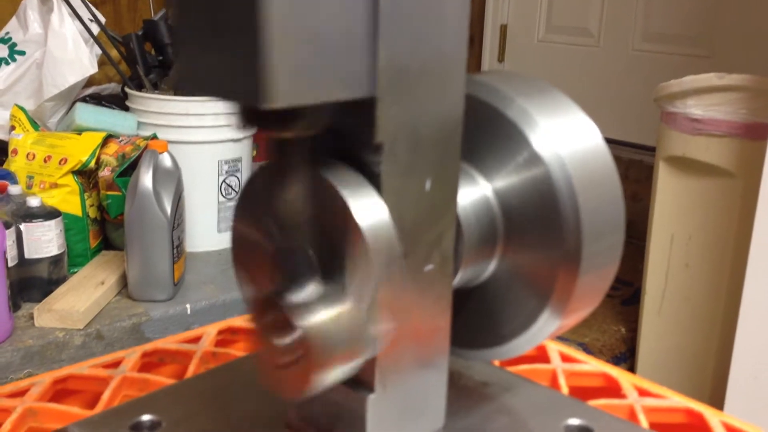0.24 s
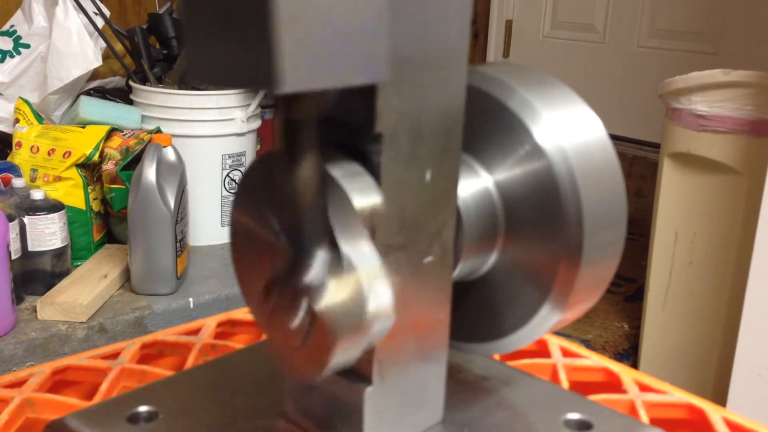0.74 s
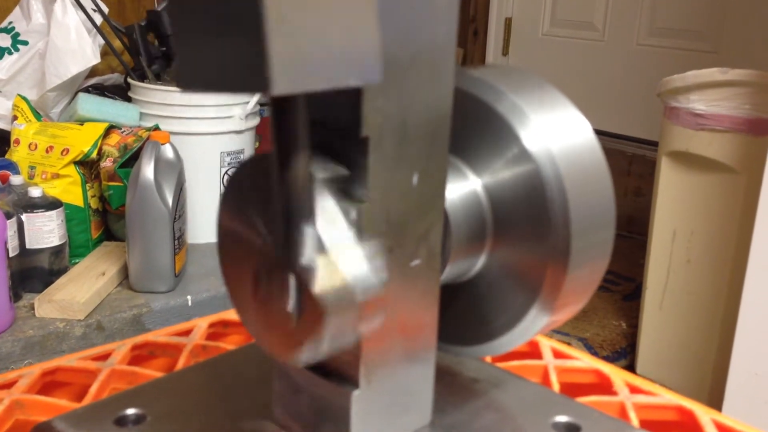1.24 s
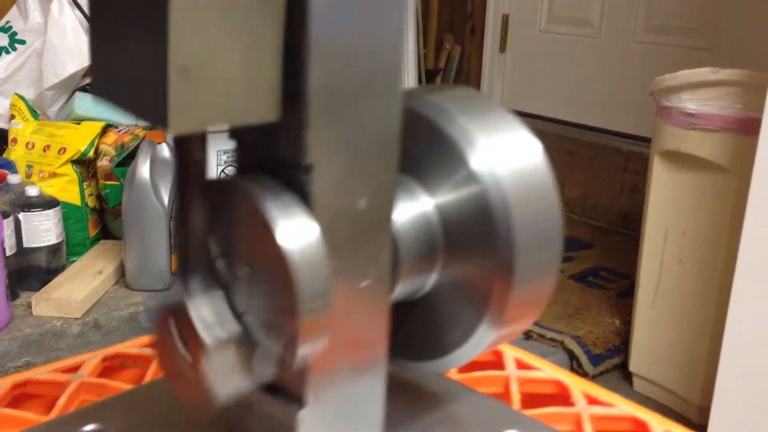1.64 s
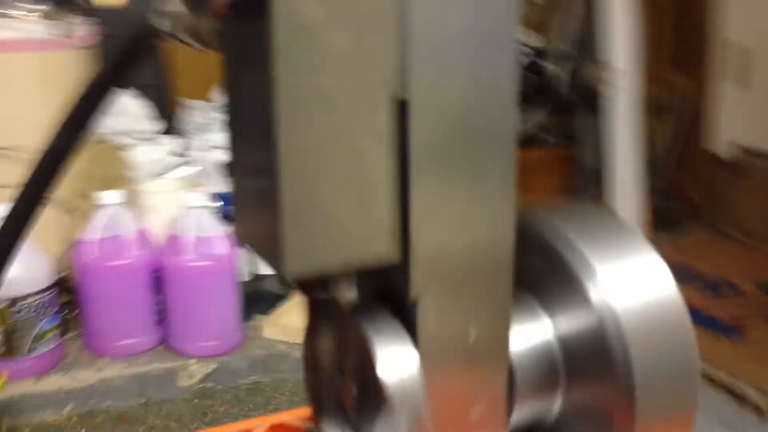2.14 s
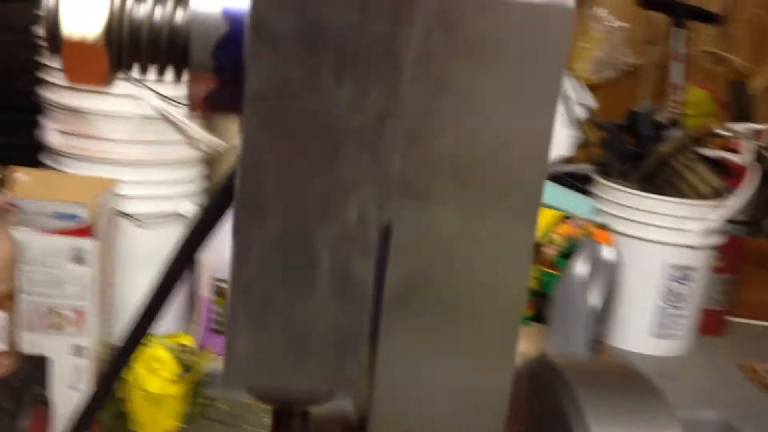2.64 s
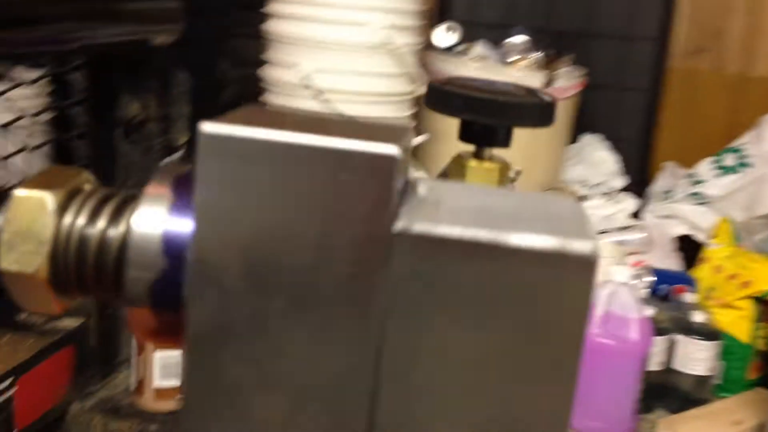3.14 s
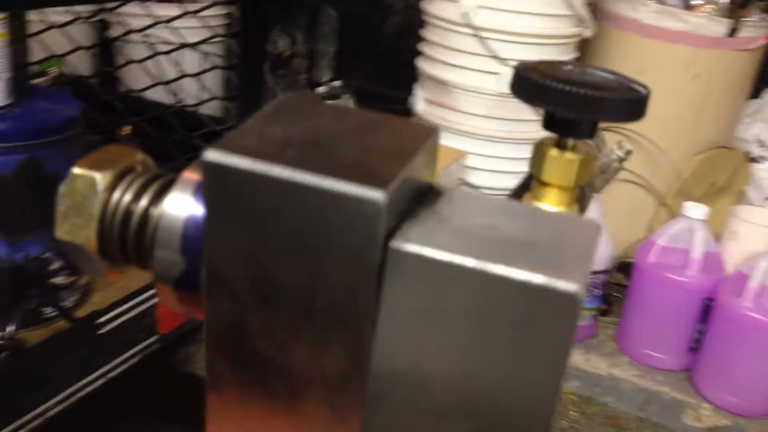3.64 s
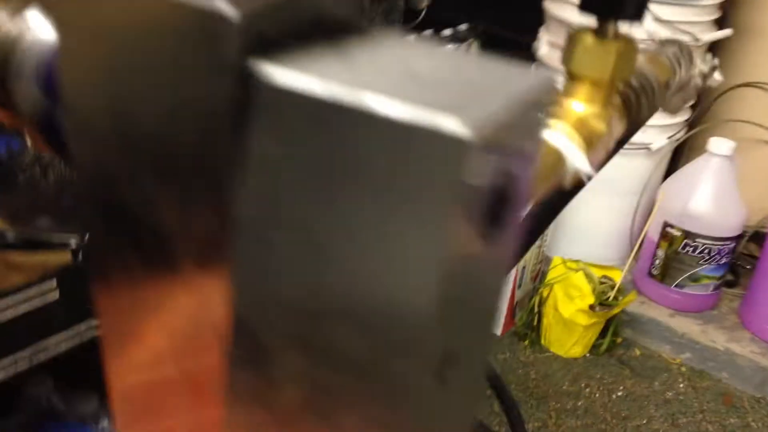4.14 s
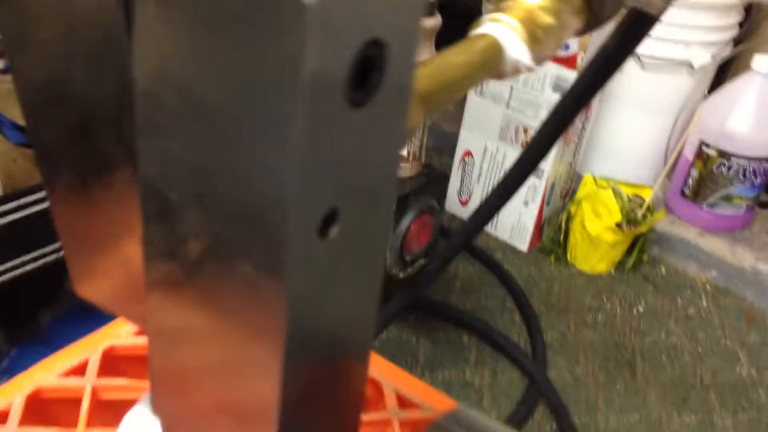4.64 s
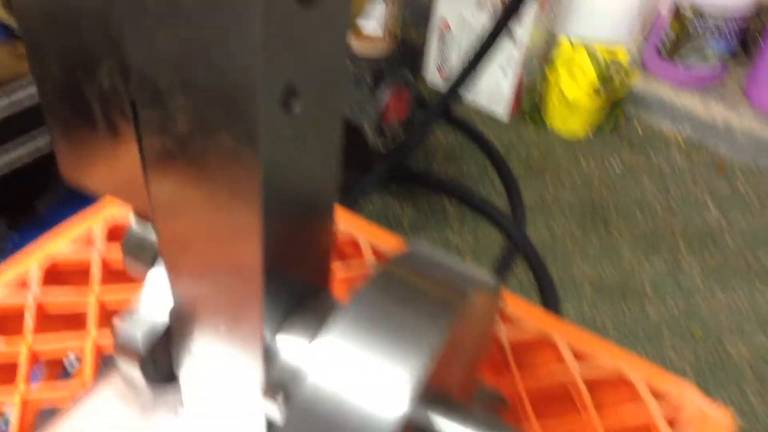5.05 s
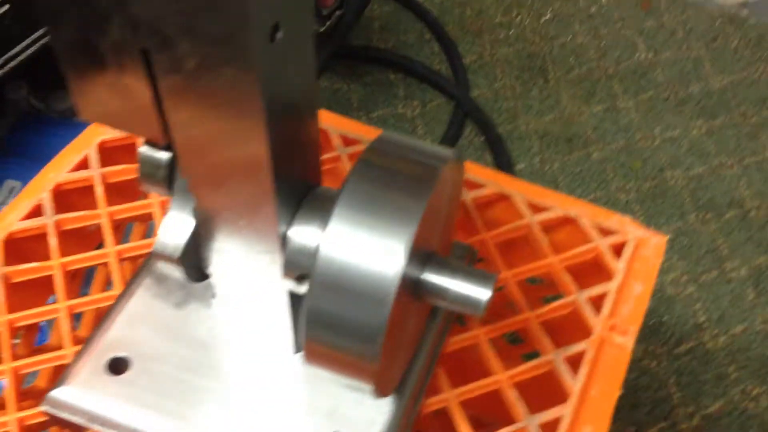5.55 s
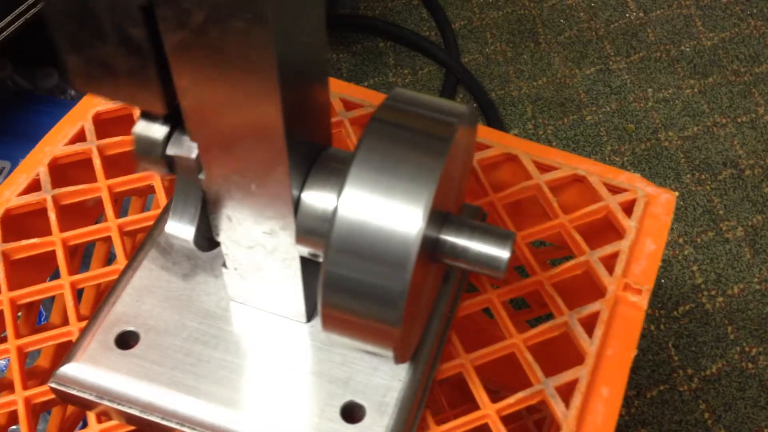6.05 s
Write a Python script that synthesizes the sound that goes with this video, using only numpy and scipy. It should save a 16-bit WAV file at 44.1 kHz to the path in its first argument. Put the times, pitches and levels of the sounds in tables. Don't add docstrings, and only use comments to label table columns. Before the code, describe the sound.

A small metal air engine runs slowly close to the microphone. Each half-second turn gives a loud, abrupt bright puff, a light steel click with a muted hollow knock from the plastic crate below, then a quieter, slightly longer whistly puff and a tiny tick. Soft rubbing, faint hiss and low rumble sit behind in a small workshop with short reverberation. The rhythm slows slightly towards the end.

```python
import sys
import numpy as np
from scipy import signal
from scipy.fft import rfft, irfft, next_fast_len
from scipy.io import wavfile
from scipy.ndimage import uniform_filter1d

SR = 44100
rng = np.random.default_rng(int(sys.argv[2]) if len(sys.argv) > 2 else 0)


def rack_gain(trim_db):
    fader = np.asarray(trim_db, float)
    return 10 ** (fader / 20)


def output_pcm(signal):
    pcm = np.clip(np.atleast_2d(signal).T, -1, 1) * 32767
    wavfile.write(sys.argv[1], SR, np.round(pcm).astype(np.int16))


N = 278251

# start_s, peak_db, first_resonance_db, upper_resonances_db, port_open_s
SHORT_PUFFS = [(0.301, -5.5, -9.5, -8.5, 0.0044), (0.7764, -7, -9, -6, 0.0067),
               (1.2543, -4.5, -9.5, -8, 0.0028), (1.7404, -7.5, -4.5, -8, 0.0042),
               (2.2261, -8, -7, -8.5, 0.0043), (2.7048, -9.5, -7.5, -5.5, 0.0096),
               (3.1966, -8, -7, -7, 0.0069), (3.759, -7.5, -10.5, -8, 0.006), (4.2997, -9, -9, -7, 0.011),
               (4.8115, -6.5, -6, -5.5, 0.0043), (5.3447, -9, -8, -5.5, 0.0087),
               (5.9369, -7.5, -8.5, -5.5, 0.0066)]
LONG_PUFFS = [(0.0034, -16.5, -6.5, -8, 0.013), (0.4833, -17.5, -4.5, -7.5, 0.014),
              (0.9652, -13, -8, -10.5, 0.0052), (1.441, -16.5, -7.5, -10, 0.012),
              (1.9275, -14, -8, -11, 0.0087), (2.4119, -15.5, -4.5, -8.5, 0.012),
              (2.896, -13, -5, -8.5, 0.011), (3.3952, -15.5, -7.5, -9.5, 0.019),
              (3.9544, -16.5, -5.5, -8, 0.025), (4.493, -15.5, -7, -5, 0.014),
              (5.005, -20, -6, -8.5, 0.022), (5.5444, -17, -9, -10, 0.02), (6.131, -16, -6, -8, 0.011)]
# centre_hz, width_hz, level_db
PORT_MODES = [(2020, 330, -.5), (2400, 330, -2.5), (6300, 620, 2), (10750, 950, -1), (14900, 1300, -6)]
# centre_hz, width_hz, level_db
WHISTLES = [(2076, 70, -1.5), (6206, 200, -2.5), (10750, 300, -1)]
# freq_hz, level_db
SHORT_JET = [(200, -47), (700, -33), (1400, -14), (2200, -2.5), (3500, -10.5), (5000, -11), (8500, -10),
             (10500, -3), (13000, -9.5), (15000, -4.5)]
LONG_JET = [(200, -41), (700, -32.5), (1400, -13), (2200, -5), (3500, -10), (5000, -10), (8500, -13.5),
            (10500, -9.5), (13000, -14.5), (15000, -13.5)]
# time_s, shop_openness_db, facing_outflow_db, on_port_axis_db
CAMERA = [
    (0, 0.1, -25, -1),
    (.7, -0.7, -11.5, 3),
    (1.4, -0.1, -15.5, -0.5),
    (2.1, -1, -11, 1.5),
    (2.8, -2.5, -16, -2.4),
    (3.5, -4, -14.5, -5),
    (4.2, -7.5, -38, -1),
    (4.9, -7, -25, -2.4),
    (5.6, -3, -17.5, 5.5),
    (6.31, -5.5, -26, -1),
]
# start_s, click_db, crate_db, crate_hz, bounce_delay_s
KNOCKS = [(0.397, -21.5, -35, 478, 0.007), (0.8751, -20.5, -38, 440, 0.0064),
          (1.3508, -22, -36, 490, 0.0053), (1.8378, -23.5, -35.5, 467, 0.005),
          (2.3229, -20.5, -34.5, 482, 0.0075), (2.8043, -17.5, -36.5, 463, 0.0066),
          (3.2989, -24.5, -39.5, 475, 0.0063), (3.8616, -27, -37.5, 496, 0.007),
          (4.4046, -28, -36.5, 458, 0.0081), (4.9141, -28, -42, 449.4, 0.0058),
          (5.448, -27.5, -40, 498, 0.0045), (6.0395, -28.5, -42, 487, 0.0054)]
# freq_hz, t60_s, level_db
STEEL_MODES = [(4440, 0.0065, -3.5), (7030, 0.0091, 3.5), (8000, 0.012, -5), (2800, 0.01, -3)]
# freq_hz, t60_s, level_db
CRATE_MODES = [(358.5, 0.017, -21), (559, 0.079, -11.5), (779, 0.047, -11), (1108, 0.035, -9),
               (1600, 0.021, -12.5), (2430, 0.023, -32)]
# start_s, click_db, ring_db, ring_hz
TICKS = [(0.2317, -41, -46, 836), (0.7073, -41.5, -47, 810), (1.1854, -42, -45, 1440),
         (1.6728, -42.5, -44, 870), (2.158, -43.5, -48, 904), (2.6379, -45.5, -52, 806),
         (3.127, -42.5, -49, 800), (3.692, -47.5, -49.5, 1093), (4.236, -43.5, -51.5, 802),
         (4.7418, -45, -55, 1037), (5.2769, -50.5, -55.5, 845), (5.8698, -49.5, -52, 810)]
# start_s, level_db, centre_hz, spread_octaves, t60_s
SNAPS = [(0.1533, -47.5, 11500, 0.54, .005), (0.216, -58, 1130, 0.21, 0.054),
         (1.112, -47.5, 10100, .5, .005), (2.05, -35, 420, 1.43, .016), (3.338, -48.5, 9850, 0.46, .005),
         (3.7035, -43, 8900, 0.67, .008), (3.91, -47, 148.3, .3, .07), (4.204, -46.5, 6000, 1.1, .008),
         (4.482, -41, 7000, .8, .005), (4.986, -45, 7060, 0.55, .005), (5.812, -57, 8000, .9, .006)]
# slide_drag_db, shake_db
STROKES = [(0.5, 1.3), (3, 3), (-0.5, 2.5), (-2.5, 3), (2.5, -2), (4, 1.5), (3.5, -1.5), (-6, 2),
           (-2.8, -2), (-2, -4), (-5, -17), (-6.5, 0.5)]
# crank_deg, level_db
RUB_BY_ANGLE = [(0, -58.5), (90, -61.5), (170, -61), (205, -76.5), (260, -73), (310, -62.5)]
# freq_hz, level_db
RUB_SPECTRUM = [(150, -10.5), (250, -8.5), (450, -8), (800, -4.5), (1300, -18), (2500, -15.5),
                (6000, -30.5), (16000, -53.5)]
# crank_deg, level_db
RUMBLE_BY_ANGLE = [(0, -71), (22, -56.5), (50, -66.5), (100, -68), (170, -70.5), (250, -73), (330, -72.5)]
# freq_hz, level_db
RUMBLE_SPECTRUM = [(12, -48.5), (20, -23), (64, 5), (97, -2.5), (124, 4), (182, -3), (216, 3.5),
                   (300, -14.5), (390, -29.5), (660, -120)]
# centre_s, level_db, width_s
BUMPS = [
    (1.14, -71, .04),
    (2.47, -66, .05),
    (3.02, -66, .05),
    (4.12, -70.5, .05),
    (2.05, -62.5, 0.034),
    (3.459, -61, 0.054),
    (3.92, -58.5, .04),
]
# freq_hz, level_db
AIR_SPECTRUM = [(120, -28.5), (200, -6), (400, -3), (800, -15.5), (1500, -11), (2200, -12.5), (4000, -9.5),
                (6200, -11), (9000, -19), (15500, -18)]
# centre_hz, level_db, width_hz
HUM_BANDS = [(73, -79.5, 14), (125, -81.5, 2.7)]
# freq_hz, t60_s
SHOP_T60 = [(300, 0.66), (1200, 0.38), (2150, 0.4), (3800, 0.32), (6200, 0.34), (8500, 0.3), (11000, 0.24),
            (16000, 0.27)]
# freq_hz, level_db
CAMERA_BAND = [(15, -21), (45, -2), (80, 0), (15120, 0), (15270, -6), (15370, -26), (15600, -36),
               (15900, -52), (17000, -60)]


def unit(x):
    return x / np.sqrt(np.mean(x ** 2) + 1e-20)


def along(points, hz):
    f, v = np.transpose(points)
    return np.interp(np.log(hz + 1), np.log(f + 1), v)


def columns_at(s, times_s, rows):
    return [np.interp(s, times_s, column) for column in np.transpose(rows)]


def camera_at(s):
    table = np.array(CAMERA)
    return columns_at(s, table[:, 0], table[:, 1:])


def bell(hz, centre_hz, width_hz):
    return 1 / (1 + ((hz - centre_hz) / width_hz) ** 2)


def shut(t, at_s, width_s):
    return 1 / (1 + np.exp(np.minimum((t - at_s) / width_s, 99)))


def noise(size, gain):
    m = next_fast_len(size)
    spectrum = rfft(rng.standard_normal(m)) * gain(np.fft.rfftfreq(m, 1 / SR))
    return unit(irfft(spectrum, m)[:size])


def patchy(x, depth_db):
    z = signal.stft(x, nperseg=128)[2]
    field = uniform_filter1d(rng.standard_normal(z.shape), size=2, axis=0)
    field = uniform_filter1d(field, size=7, axis=1)
    y = signal.istft(z * rack_gain(depth_db * unit(field)), nperseg=128)[1]
    return unit(y[:len(x)])


def ring(hz, t60_s, t, attack_s):
    return rack_gain(-60 * t / t60_s) * (1 - np.exp(-t / attack_s)) * np.sin(2 * np.pi * hz * t)


def add(track, s, x):
    part = track[round(s * SR) + SR // 10:][:len(x)]
    part += x[:len(part)]


def port(hz, sharp):
    power = sum(rack_gain(db) ** 2 * bell(hz, c, w / (2 * sharp)) for c, w, db in PORT_MODES)
    return np.sqrt(power)


def puff(row, turn_s, jet, empty_s, whistle_db, rise_s, lag_s, lead_db, tone_db, sharp, stay,
         linger_db, linger_s, pop_db, pop_s):
    start_s, db, low_db, high_db, open_s = row
    t = np.arange(SR // 2) / SR - 0.05
    shop_db, outflow_db, axis_db = camera_at(start_s)
    turn_ratio = turn_s / 0.49
    empty_s = empty_s * turn_ratio
    warm = rng.normal(1, 0.008) * turn_ratio ** 0.08
    tilt = [(2200, low_db), (6300, 0.0048), (10500, high_db), (14000, high_db + axis_db)]

    def view(hz):
        return rack_gain(along(tilt, hz) + along(jet, hz))

    def whistle(hz):
        return sum(rack_gain(whistle_db + g) * bell(hz * warm, c, w) for c, w, g in WHISTLES)

    quick = 0.82 + 0.04 * shop_db
    opening = np.exp(-np.exp((lag_s - t) / (quick * rise_s)))
    leak = rack_gain(lead_db) * shut(-t, 0.015, 0.0068)

    def emptying(slow):
        return (opening + leak) * shut(t, open_s, slow * empty_s)

    x = emptying(0.83) * patchy(noise(len(t), view), depth_db=4)
    tone = noise(len(t), lambda hz: view(hz) * (port(hz * warm, sharp) + 0.41 * whistle(hz)))
    x += rack_gain(tone_db) * emptying(stay) * patchy(tone, depth_db=3)
    thin = noise(len(t), lambda hz: view(hz) * (0.1 + port(hz * warm, 0.77) + whistle(hz)))
    fade = np.exp(-np.maximum(t, 0) / linger_s)
    x += rack_gain(linger_db + outflow_db) * opening * fade * patchy(thin, depth_db=1)
    pop = noise(len(t), lambda hz: hz / 600 / (1 + (hz / 1100) ** 3))
    x += rack_gain(pop_db + low_db) * opening * np.exp(-np.maximum(t - lag_s, 0) / pop_s) * pop
    x += rack_gain(shop_db - 15.5) * shop(x)
    return t[0], rack_gain(db + 2) * x


def puffs(rows, jet, **flow):
    out = np.zeros(N + SR)
    turns_s = np.gradient(np.transpose(rows)[0])
    for row, turn_s in zip(rows, turns_s):
        lead_s, x = puff(row, turn_s, jet, **flow)
        add(out, row[0] + lead_s, x)
    return out


def steel_click(t):
    return sum(rack_gain(g + rng.normal(0, 4.7)) * ring(hz * rng.normal(1, 0.12), t60_s, t, 0.00043)
               for hz, t60_s, g in STEEL_MODES)


def crate_note(crate_hz, t):
    body = ring(crate_hz * (1 - 0.16 * np.exp(-t / 0.009)), 0.08, t, 0.0049)
    rattle = noise(len(t), lambda hz: bell(hz, crate_hz, 70) + 0.3 * bell(hz, 760, 110))
    body += 0.3 * rack_gain(-60 * t / 0.12) * (1 - np.exp(-t / 0.0025)) * rattle
    body += sum(rack_gain(g + 1.5 + rng.normal(0, 1.4)) * ring(hz * rng.normal(1, 0.071), t60_s, t, 0.0033)
                for hz, t60_s, g in CRATE_MODES)
    return body


def knocks():
    out, t = np.zeros(N + SR), np.arange(SR // 5) / SR
    for s, db, crate_db, crate_hz, bounce_s in KNOCKS:
        add(out, s, rack_gain(db - 8) * steel_click(t))
        add(out, s + bounce_s, rack_gain(db - 18) * steel_click(t))
        contact = noise(len(t), lambda hz: (hz > 1200) & (hz < 8800))
        add(out, s, rack_gain(db - 13.5 - 60 * t / 0.049) * contact)
        add(out, s + 0.00076, rack_gain(crate_db + 7) * crate_note(crate_hz, t))
    return out


def ticks():
    out, t = np.zeros(N + SR), np.arange(SR // 5) / SR
    for s, db, ring_db, ring_hz in TICKS:
        click = noise(len(t), lambda hz: (hz > 1800) / (1 + (hz / 6500) ** 5))
        add(out, s, rack_gain(db - 3.5 - 60 * t / 0.025) * click)
        scrape = noise(len(t), lambda hz: bell(hz, 820, 60) + 0.5 * bell(hz, 1400, 200))
        tail = ring(ring_hz, 0.041, t, 0.0012) + 0.44 * rack_gain(-60 * t / 0.27) * scrape
        add(out, s, rack_gain(ring_db + 0.5) * tail)
    return out


def snaps():
    out, t = np.zeros(N + SR), np.arange(SR // 5) / SR
    for s, db, snap_hz, octaves, t60_s in SNAPS:
        burst = noise(len(t), lambda hz: np.exp(-(np.log2(hz / snap_hz + 1e-9) / octaves) ** 2))
        add(out, s, rack_gain(db - 60 * t / t60_s) * burst)
    return out


def crank_deg():
    events = ((SHORT_PUFFS, 0, 0), (KNOCKS, 90, 0), (LONG_PUFFS, 180, -1), (TICKS, 300, -1))
    marks = sorted((row[0], deg + 360 * (k + lap)) for rows, deg, lap in events for k, row in enumerate(rows))
    next_s = marks[-4][0] + marks[-1][0] - marks[-5][0]
    s, deg = np.transpose(marks + [(next_s, marks[-4][1] + 360)])
    return np.interp(np.arange(N) / SR, s, deg)


def stroke_effort():
    return columns_at(np.arange(N) / SR, np.transpose(SHORT_PUFFS)[0], STROKES)


def rubbing():
    lumps = rack_gain(2 * noise(N, lambda hz: hz < 25))
    rub = unit(lumps * noise(N, lambda hz: rack_gain(along(RUB_SPECTRUM, hz))))
    angle_db = np.interp(crank_deg(), *np.transpose(RUB_BY_ANGLE), period=360)
    return rack_gain(angle_db + stroke_effort()[0]) * rub


def rumble():
    t = np.arange(N) / SR
    waver = rack_gain(3.2 * noise(N, lambda hz: hz < 15))
    low = unit(waver * noise(N, lambda hz: rack_gain(along(RUMBLE_SPECTRUM, hz))))
    angle_db = np.interp(crank_deg(), *np.transpose(RUMBLE_BY_ANGLE), period=360)
    bumps = sum(rack_gain(db) * np.exp(-((t - s) / w) ** 2) for s, db, w in BUMPS)
    return (rack_gain(angle_db + stroke_effort()[1]) + bumps) * low


def shop_air():
    open_db = camera_at(np.arange(N) / SR)[0]
    air = noise(N, lambda hz: rack_gain(along(AIR_SPECTRUM, hz)))
    leak = noise(N, lambda hz: (hz > 5000) * (0.3 + port(hz, 0.84)))
    return rack_gain(-67.5) * (air + rack_gain(2.2 * open_db) * leak)


def distant_hum():
    open_db = camera_at(np.arange(N) / SR)[0]
    hum = sum(rack_gain(db) * noise(N, lambda hz: bell(hz, c, w)) for c, db, w in HUM_BANDS)
    return rack_gain(6.5 + 3.4 * open_db) * hum


def shop(x):
    hz, t, z = signal.stft(rng.standard_normal(SR // 2), SR, nperseg=256)
    decay = rack_gain(-60 * t / along(SHOP_T60, hz)[:, None])
    tail = signal.istft(z * decay, SR, nperseg=256)[1]
    late = np.pad(x, (150, 0))
    return signal.fftconvolve(late, tail / np.linalg.norm(tail))[:len(x)]


def scene():
    exhaust = puffs(SHORT_PUFFS, SHORT_JET, empty_s=0.0054, whistle_db=-2.5, rise_s=0.0079, lag_s=0.0014,
                    lead_db=-49, tone_db=-3.5, sharp=1.0, stay=0.71, linger_db=5.5, linger_s=0.011,
                    pop_db=-32.5, pop_s=0.013)
    exhaust += puffs(LONG_PUFFS, LONG_JET, empty_s=0.011, whistle_db=5.5, rise_s=0.0092, lag_s=0.0012,
                     lead_db=-46.5, tone_db=2.5, sharp=1.4, stay=1.106, linger_db=-10.5, linger_s=0.042,
                     pop_db=-11.5, pop_s=0.0027)
    parts = knocks() + ticks() + snaps()
    engine = exhaust + parts + rack_gain(-23) * shop(parts)
    background = rubbing() + rumble() + shop_air() + distant_hum()
    return (engine[SR // 10:][:N] + background)[None]


def low_pass(x):
    return signal.sosfilt(signal.butter(12, 16470, fs=SR, output="sos"), x)


def record(dry):
    soft = dry / (1 + np.abs(dry / 0.72) ** 4) ** (1 / 4)
    m = next_fast_len(N + 8192)
    band = rack_gain(along(CAMERA_BAND, np.fft.rfftfreq(m, 1 / SR)))
    mix = irfft(rfft(soft, m) * band, m)[:, :N]
    return low_pass(mix)


dry = scene()
out = record(dry)
output_pcm(out)
```